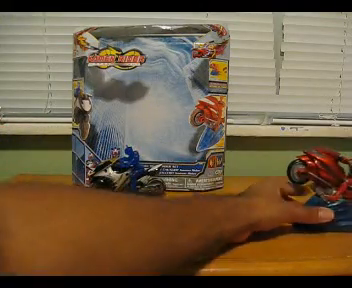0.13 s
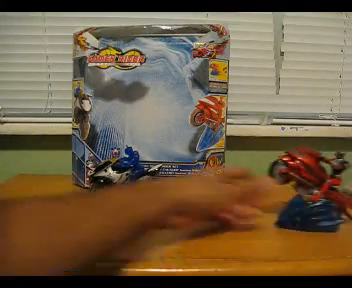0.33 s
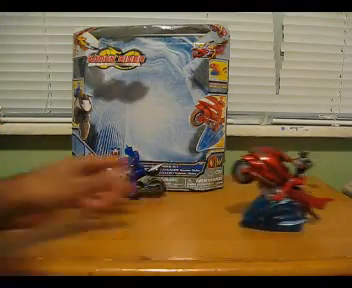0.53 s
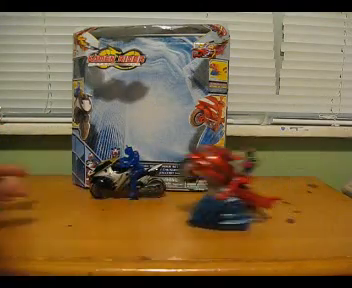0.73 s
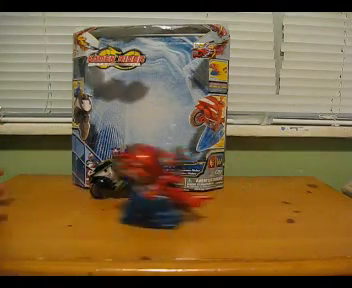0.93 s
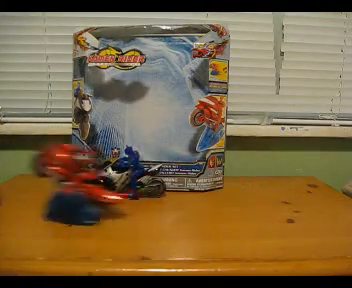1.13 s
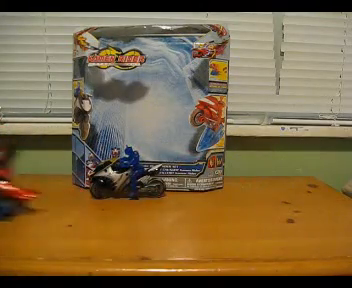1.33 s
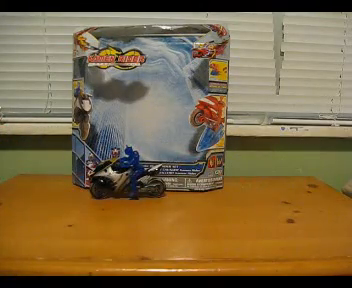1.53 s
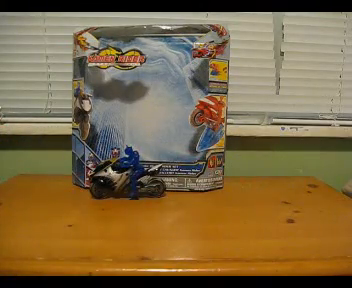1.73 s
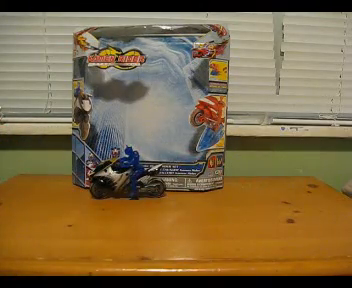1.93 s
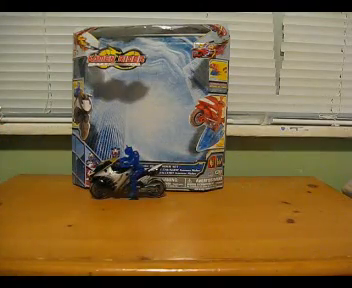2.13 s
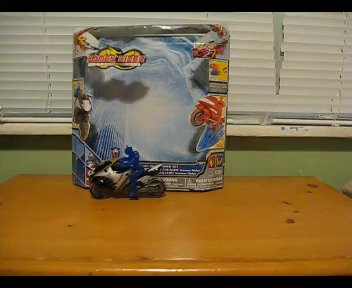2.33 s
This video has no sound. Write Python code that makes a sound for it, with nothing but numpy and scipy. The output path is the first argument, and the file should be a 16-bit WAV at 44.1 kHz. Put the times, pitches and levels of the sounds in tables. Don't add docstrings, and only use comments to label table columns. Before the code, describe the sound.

Small spring-driven toy rolls noisily over wood, drops off the edge, whirrs brightly and ticks to rest

```python
import sys
import numpy as np
from scipy import signal
from scipy.fft import rfft, irfft, next_fast_len
from scipy.io import wavfile
from scipy.ndimage import uniform_filter1d, map_coordinates

SR = 44100
rng = np.random.default_rng(int(sys.argv[2]) if len(sys.argv) > 2 else 0)


def field_ratio(decibels):
    return 10 ** (np.asarray(decibels, dtype=float) / 20)


def dump(signal):
    limited = np.clip(np.atleast_2d(signal).T, -1, 1)
    pcm = np.round(limited * 32767).astype(np.int16)
    wavfile.write(sys.argv[1], SR, pcm)


N = 110161
TIME = np.arange(N) / SR
LEAVES_S = 1.32

# (frequency [Hz], width [Hz], level [dB])
SHELL = [(772, 30, -2), (821.5, 64, 0), (1087, 60, -2), (1210, 38, 0), (1310, 98, -4), (1548, 120, -5),
         (1794, 92, -4.5), (2124, 300, -10.5)]
# (frequency [Hz], width [Hz], level [dB])
LOOSE = [(2167, 277, -2.5), (3080, 400, -0.5), (4414, 335, -1.5)]
# (frequency [Hz], width [Hz], level [dB])
EDGES = [(5520, 1230, 2), (6710, 1290, 1.5), (8370, 1240, -4)]


def unit(x):
    return x / np.sqrt(np.mean(x ** 2) + 1e-20)


def along(points, hz):
    f, value = np.transpose(points)
    return np.interp(np.log(hz + 1), np.log(f + 1), value)


def level(rows):
    s, db = np.transpose(rows)
    return field_ratio(np.interp(TIME, s, db, left=-120, right=-120))


def wobble(rate):
    knots = rng.standard_normal(int(N * rate / SR) + 4)
    return map_coordinates(knots, [np.arange(N) * rate / SR])


def filtered(x, response):
    m = next_fast_len(N + SR // 2)
    return irfft(rfft(x, m) * response(np.fft.rfftfreq(m, 1 / SR)), m)[:N]


def ringing(x, modes):
    def response(f):
        total = 0
        for k, (centre, width, db) in enumerate(modes):
            resonance = 1j * f * width / (centre ** 2 - f ** 2 + 1j * f * width)
            total = total + (-1) ** k * field_ratio(db) * resonance
        return total
    return filtered(x, response)


def hiss(spectrum):
    return unit(filtered(rng.standard_normal(N), lambda hz: field_ratio(along(spectrum, hz))))


def knocks(per_s, spread_db):
    hit = rng.random(N) < per_s / SR
    size_db = spread_db * np.minimum(rng.exponential(size=N), 2)
    return unit(hit * rng.choice([-1, 1], N) * field_ratio(size_db))


def rings(rows, t60):
    roughness, rise_s = 0.45, 0.002
    out, t = np.zeros(N + SR), np.arange(SR // 5) / SR
    drift = roughness * wobble(150)
    for s, db, hz in rows:
        start = round(s * SR)
        phase = 2 * np.pi * hz * t + np.resize(drift[start:], len(t))
        swell = 1 - np.exp(-t / rise_s)
        out[start:][:len(t)] += field_ratio(db - 0.5 - 60 * t / t60) * swell * np.sin(phase)
    return out[:N] * (1 + roughness * wobble(120))


def room_hiss():
    # (frequency [Hz], level [dB per Hz])
    room = [(15, -34), (25, -12), (148, -4), (529, -3.5), (621, -0.5), (949, -4), (1110, -4), (1310, -5.5),
            (14200, -26)]
    return field_ratio(-50) * hiss(room)


def camera_ticks():
    # (first [s], last [s], spacing [s])
    runs = [
        (.0158, 1.2, .02),
        (1.2056, 2.49, .020005),
    ]
    rise_s, fall_s = 0.00004, 0.00011
    train, t = np.zeros(N), np.arange(SR // 500) / SR
    for first, last, spacing in runs:
        at = np.arange(first, last, spacing)
        sign = (-1.0) ** np.arange(len(at))
        train[np.round(at * SR).astype(int)] = sign * field_ratio(rng.normal(0, 1.6, len(at)))
    spike = 1.6 * (1 - np.exp(-t / rise_s)) * np.exp(-t / fall_s)
    return field_ratio(-28) * np.convolve(train, spike)[:N]


def walls(x):
    # (frequency [Hz], time to fall 60 dB [s])
    echo_t60 = [(200, 0.3), (2000, 0.29), (10000, 0.065)]
    hz, t, z = signal.stft(rng.standard_normal(SR // 2), SR, nperseg=256)
    fall = field_ratio(-60 * t / along(echo_t60, hz)[:, None])
    tail = signal.istft(z * fall, SR, nperseg=256)[1]
    late = np.pad(x, (200, 0))
    return signal.fftconvolve(late, tail / np.linalg.norm(tail))[:N]


def rolling():
    # (time [s], level [dB])
    roll = [(0.0, -37.5), (0.024, -51), (0.19, -56.5), (0.502, -41), (0.554, -31), (0.642, -41),
            (0.68, -33.5), (0.8, -32.5), (0.824, -25), (1.036, -28.5), (1.044, -25), (1.202, -27.5),
            (1.226, -22.5), (1.332, -20.5), (1.426, -22.5), (1.442, -21), (1.472, -38), (1.52, -55)]
    # (frequency [Hz], width [Hz], level [dB])
    board_modes = [(106, 37, -14), (163, 26, -8), (235.6, 7.8, -9.5), (327.6, 12.3, 1.5), (590, 36, -1)]
    # (frequency [Hz], level [dB per Hz])
    rub_colour = [(41, -58), (70, -18), (321, -10.5), (718, -8), (815, -5), (6080, -22), (9690, -24),
                  (11000, -48), (14300, -76), (22000, -120)]
    release_s, speedup_s, leave_fade_s = 0.55, 0.43, 0.051
    board_db, shell_db, chatter_db, rub_db = -8.5, -6.5, -8, -9

    speed = 0.033 + 1 - np.exp(-np.maximum(TIME - release_s, 0) / speedup_s)
    on_wood = 1 / (1 + np.exp(np.clip((TIME - LEAVES_S) / leave_fade_s, -50, 50)))
    lurch = level(roll) * field_ratio(1.58 * wobble(25.37))

    bumps = knocks(260, spread_db=1.0) + 0.48 * rng.standard_normal(N)
    board = ringing(field_ratio(board_db) * bumps * lurch * on_wood, board_modes)
    board /= ringing(bumps, board_modes).std()
    shell = field_ratio(shell_db) * ringing(bumps * lurch * (0.5 + on_wood), SHELL)
    shell /= ringing(bumps, SHELL).std()

    teeth = knocks(110, spread_db=1.0) + 1.2 * rng.standard_normal(N)
    parts = unit(ringing(teeth, LOOSE)) + field_ratio(-2.5) * unit(ringing(teeth, EDGES))
    chatter = field_ratio(chatter_db) * speed * parts
    rub = field_ratio(rub_db) * hiss(rub_colour) * (0.42 + on_wood) * field_ratio(2.8 * wobble(59.53))
    return board + shell + lurch * (chatter + rub)


def blows():
    # (time [s], peak level [dB], frequency [Hz]) wheels thumping the wood, in the board's
    thumps = [(0.448, -33.5, 320), (0.504, -30.5, 336), (0.566, -35, 323), (0.614, -39, 356),
              (0.676, -25, 322), (0.722, -28.5, 341), (0.833, -24.5, 341), (0.922, -19, 323),
              (1.003, -32.5, 256), (1.05, -20, 324), (1.104, -22.5, 331.6), (1.173, -24, 327.6),
              (1.207, -31, 313),
              (0.444, -38.5, 150),
        (.71, -30, 161),
        (0.941, -22.5, 243.4),
        (1.225, -21, 324.5),
        (1.263, -23, 331),
        (1.301, -26.5, 305),
        (1.31, -20, 584),
        (.77, -32, 590),
    ]
    base_knocks = [(0.552, -25, 791), (0.663, -28, 796), (0.688, -25, 830), (0.762, -24, 780),
                   (0.822, -21.5, 835), (0.85, -19, 835), (0.879, -23, 811), (0.904, -28, 837),
                   (0.931, -22.5, 940), (1.009, -33, 842), (1.042, -33, 828), (1.086, -31, 809),
                   (1.127, -17, 826), (1.173, -18, 773), (1.204, -28, 777), (1.227, -23, 834),
                   (1.253, -17, 830), (1.304, -13.5, 837), (1.337, -17, 837), (1.396, -27.5, 810)]
    raps = [(0.555, -26, 1084), (0.6833, -28.5, 1090), (0.7611, -21, 1345), (0.807, -18.5, 1256),
            (0.851, -14, 1300), (0.9096, -19, 1190), (0.9336, -32, 1214), (0.9544, -19, 1278),
            (0.9793, -19, 1200), (1.0325, -21, 1170), (1.069, -22, 1235), (1.1167, -17, 1350),
            (1.151, -21, 1345), (1.2004, -22.5, 1080), (1.2266, -14, 1100), (1.2569, -9, 1087),
            (1.3027, -20, 1093), (1.3276, -15, 1094), (1.35, -18, 1436), (1.438, -13.5, 1121)]
    snaps = [
        (0.5018, -21.5, 2080),
        (0.5526, -12.5, 1630),
        (0.7013, -36, 2250),
        (0.8495, -12, 1545),
        (0.9238, -17, 2070),
        (1.0464, -19, 1460),
        (1.1453, -9, 2340),
        (1.3114, -18, 1730),
        (1.3379, -10.5, 1730),
        (1.4331, -13, 1970),
    ]
    strays = [
        (0, -25.5, 1370),
        (.8222, -13, 9150),
        (0.8502, -12, 1910),
    ]
    wood = rings(thumps, 0.14) * (TIME < LEAVES_S + 0.01)
    figure = rings(raps + strays[:1], 0.06)
    plastic = rings(snaps + strays[1:], 0.025)
    return wood + rings(base_knocks, 0.1) + figure + plastic


def clacks():
    # (time [s], peak level [dB], body knock over it [dB], edge ring over
    # it [dB])
    clack_events = [(0.0573, -29.5, 6, -5.5), (0.406, -28.5, -5, -10), (0.4758, -36, -10, -3),
                    (0.5012, -24, -1, -7), (0.5511, -15, -12, -16), (0.6597, -28.5, -6.5, -12),
                    (0.7012, -13.5, -10, -4), (0.7345, -21, -18, -4), (0.7654, -18.5, -9, -5.5),
                    (0.8164, -13, 1, -6), (0.8217, -14, -25, 0.5), (0.8495, -14, -6, -5),
                    (0.8755, -18, -8, -5), (0.8863, -15, 0, -3), (0.9128, -11.5, -8, -6),
                    (0.9226, -11, -8, -5.5), (0.9577, -13, -16, -7), (1.0005, -22, -12, -14),
                    (1.0316, -3.5, -7.5, -1.5), (1.0446, -7, -2.5, 0), (1.0988, -35, -11, -5),
                    (1.1155, -3.5, -4, -5), (1.1999, -2.5, -24, -2.5), (1.264, -14, 8.5, -4),
                    (1.2704, -17, -10, 5), (1.2799, -7.5, -18, 0), (1.2952, -7.5, -14, 0),
                    (1.3526, -15.5, -17, 4.5), (1.367, -11.5, -8, 2), (1.4045, -10, -6, -16),
                    (1.1376, -14, -15, -8), (1.2157, -11, -12, -1.5), (1.4306, -7, -2.5, -8),
                   (1.456, -10, -10, -20), (1.5551, -15.5, 8, -8), (1.9167, -29, 6, -8),
                   (1.9365, -26, -10, -1), (1.9526, -29.5, -2, -18), (1.9674, -21.5, -8, -18),
                   (1.9782, -26, 0, -14), (2.0138, -29, 0, 2), (2.0358, -36.5, 4, 11.5), (2.065, -32, 2, 6),
                   (2.0803, -32.5, -8, 7.5), (2.114, -34, -13, -3), (2.143, -33.5, -9, -6),
                   (2.166, -25, -11, -7), (2.2052, -29.5, -11, 2), (2.314, -30, -17, -3.5)]
    clack_t60, rattle_t60, rattle_db, rise_s = 0.014, 0.091, -19, 0.00056
    force, t = np.zeros((3, N + SR)), np.arange(SR // 20) / SR
    fall = field_ratio(-60 * t / clack_t60) + field_ratio(rattle_db - 60 * t / rattle_t60)
    shape = fall * (1 - np.exp(-t / rise_s))
    for s, db, knock_db, edge_db in clack_events:
        scrape = np.sign(rng.standard_normal((3, len(t)))) * shape
        strength = field_ratio(db + np.array([[0], [knock_db], [edge_db]]))
        force[:, round(s * SR):][:, :len(t)] += scrape * strength
    parts = field_ratio(8.0) * ringing(force[0, :N], LOOSE)
    body = field_ratio(12.5) * ringing(force[1, :N], SHELL)
    edges = field_ratio(4.5) * ringing(force[2, :N], EDGES)
    return parts + body + edges


def spin():
    # (time [s], level [dB])
    spin_level = [
        (1.44, -46),
        (1.472, -30.5),
        (1.558, -17),
        (1.678, -18),
        (1.748, -19.5),
        (1.892, -52.5),
        (1.964, -40.5),
        (2.224, -51),
        (2.3, -70),
    ]
    # (frequency [Hz], level [dB per Hz])
    whirr = [(450, -92), (680, -17), (1400, -11.5), (2700, -5.5), (4600, -1), (7000, -7.5), (10200, -14),
             (14200, -26)]
    # (start [s], length [s], start [Hz], end [Hz], level over the whirr [dB])
    squeals = [(1.5, .055, 3350, 5000, -5), (1.52, .04, 3500, 4550, -5), (1.54, .05, 3600, 4300, -5),
               (1.552, .08, 2850, 4200, -4), (1.605, .065, 4100, 4100, -3), (1.66, .08, 4100, 3950, -2),
               (1.595, .07, 2600, 3000, -4), (1.64, .055, 3000, 2700, -4), (1.54, .06, 2650, 2650, -8),
               (1.705, .09, 2850, 2750, -5), (1.72, .09, 1750, 1850, -12), (1.565, .03, 5600, 5750, -5),
               (1.685, .03, 6450, 6450, -9), (1.96, .26, 4200, 3750, -5)]
    fuzz_rate, arch_hz = 430, 80
    out = hiss(whirr) * field_ratio(0.8 * wobble(90))
    for start, length, from_hz, to_hz, db in squeals:
        age = np.clip(TIME - start, 0, length)
        arch = np.sin(np.pi * age / length)
        hz = from_hz + (to_hz - from_hz) * age / length + arch_hz * arch
        fuzz = 0.17 + wobble(fuzz_rate) + 1j * wobble(fuzz_rate)
        tone = np.real(fuzz * np.exp(2j * np.pi * np.cumsum(hz) / SR))
        out += field_ratio(db) * abs(arch) ** 0.5 * tone
    return field_ratio(-2.0) * level(spin_level) * out


def scene():
    # (frequency [Hz], level [dB])
    side_colour = [(30, 4), (80, 2), (500, -3), (4000, 2), (12000, 14.5)]
    dull_hz, pan_db = 11560, 0.5
    on_dresser = rolling() + clacks() + blows()
    toy = filtered(on_dresser, lambda hz: 1 / (1 + 1j * hz / dull_hz) ** 2) + spin()
    room = field_ratio(5.0) * room_hiss() * field_ratio(1.9 * wobble(9.4))
    mid = toy + field_ratio(-15) * walls(toy) + room + camera_ticks()
    around = walls(toy) + room_hiss()
    side = field_ratio(-24.5) * filtered(around, lambda hz: field_ratio(along(side_colour, hz)))
    left = mid + side + toy * (field_ratio(-pan_db / 2) - 1)
    right = mid - side + toy * (field_ratio(pan_db / 2) - 1)
    return np.array([left, right])


def top_cut(x):
    return signal.sosfilt(signal.butter(12, 14390, fs=SR, output="sos"), x)


def record(dry):
    # (start [s], end [s], low [Hz], high [Hz])
    masked = [
        (1.53, 1.745, 130, 420),
        (1.55, 1.76, 105, 560),
        (1.67, 1.74, 500, 690),
    ]
    kept_db, kept_db_per_khz, masked_db = -23, 3, -38
    hz, t, z = signal.stft(dry, SR, nperseg=1024)
    hz_column = hz[:, None]
    power = abs(z) ** 2 + 1e-14
    smooth = uniform_filter1d(uniform_filter1d(power, size=12, axis=1), size=4, axis=2)
    over_db = 10 * np.log10(smooth.clip(1e-15) / power.mean((0, 1)))
    limit_db = kept_db + kept_db_per_khz * (hz_column - 10000) / 1000
    treble_keep = 1 / (1 + np.exp(np.clip(3 * (limit_db - over_db), -40, 40)))
    keep = np.where(hz_column < 8000, 1, treble_keep)
    for start, end, low_hz, high_hz in masked:
        in_band = (hz_column > low_hz) & (hz_column < high_hz)
        keep[:, in_band & (t > start) & (t < end)] = field_ratio(masked_db)
    mix = signal.istft(z * keep, SR, nperseg=1024)[1][:, :N]
    return top_cut(mix)


dry = scene()
out = record(dry)
dump(out)
```